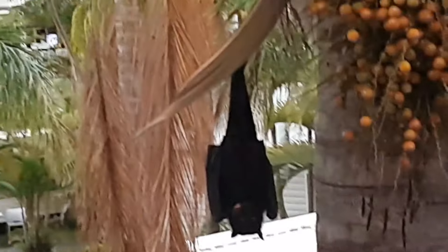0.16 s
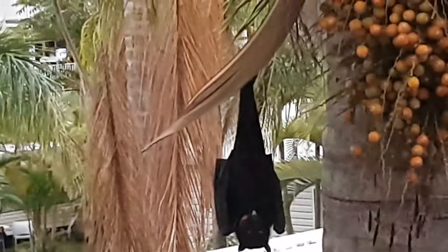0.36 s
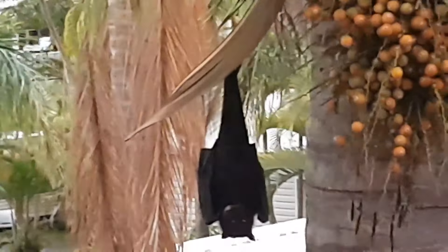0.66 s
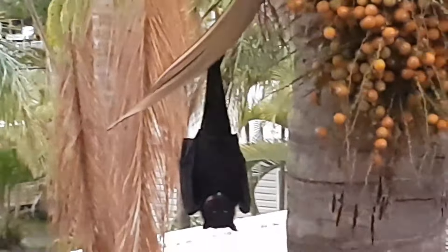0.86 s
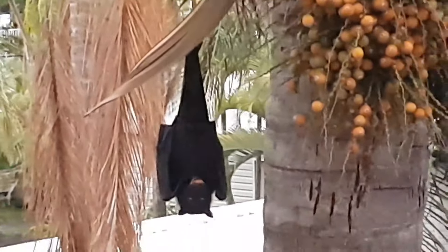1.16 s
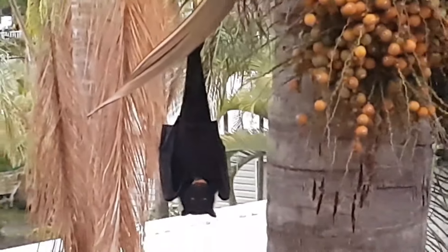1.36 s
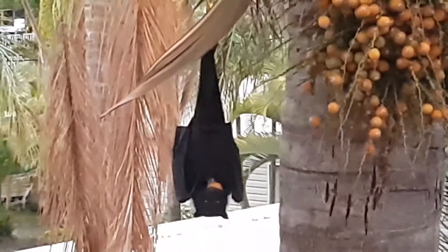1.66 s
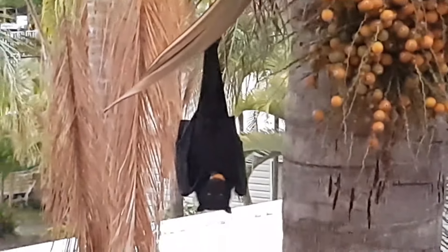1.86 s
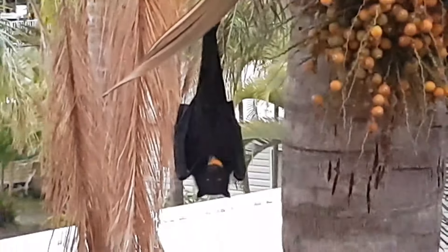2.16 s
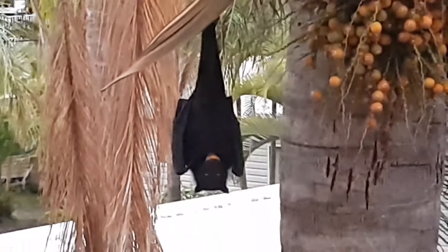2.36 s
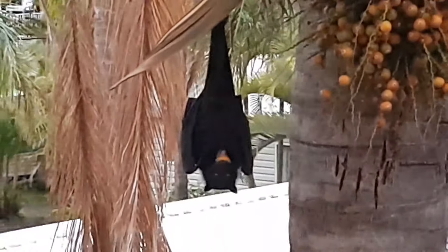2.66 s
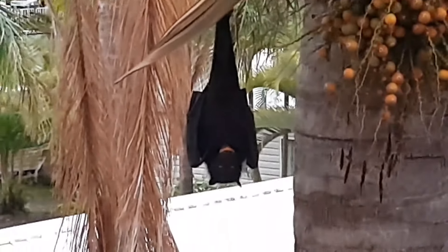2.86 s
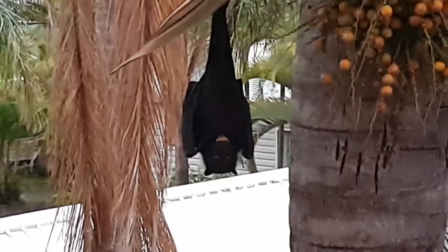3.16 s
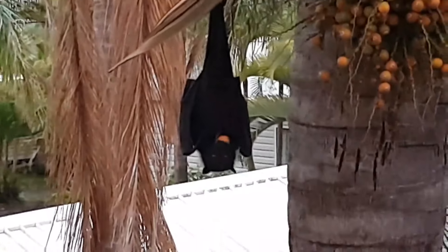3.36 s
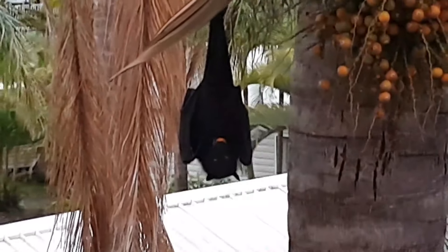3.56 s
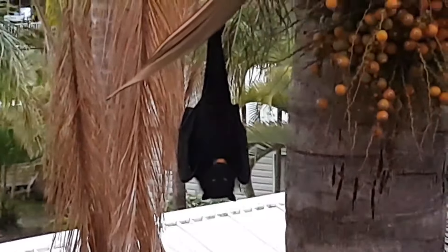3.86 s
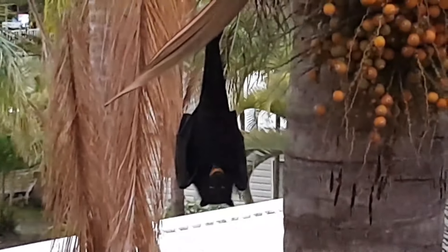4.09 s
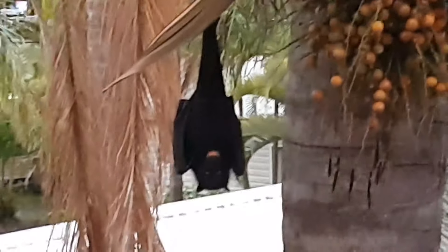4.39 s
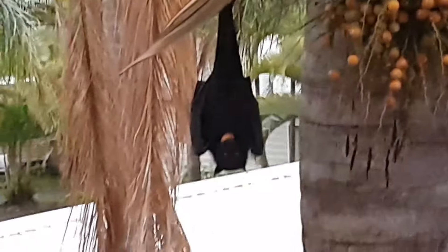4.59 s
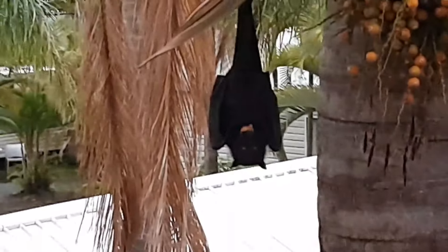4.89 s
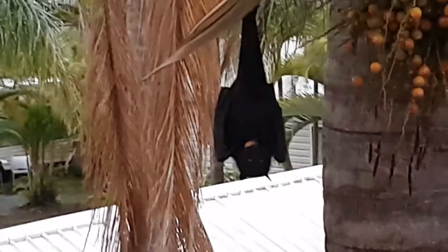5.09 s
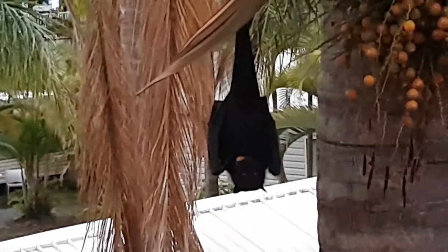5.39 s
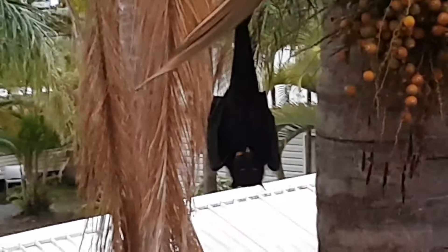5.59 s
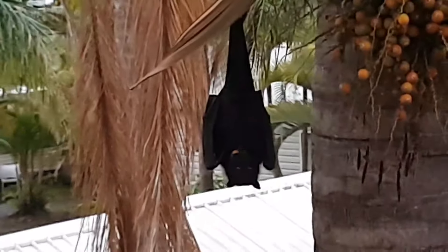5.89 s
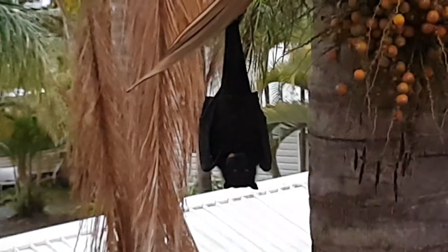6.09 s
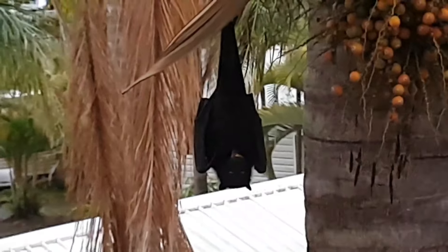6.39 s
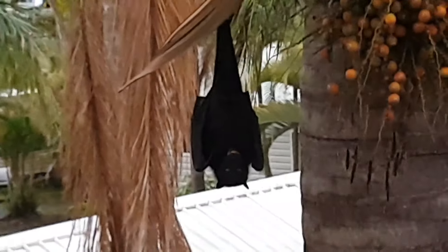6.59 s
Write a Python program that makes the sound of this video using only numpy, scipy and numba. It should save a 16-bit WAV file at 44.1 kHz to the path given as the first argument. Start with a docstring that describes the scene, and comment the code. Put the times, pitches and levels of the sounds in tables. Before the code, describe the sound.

Hoarse, hissing fruit bat rasps and a few throaty yelps burst out over paired cricket chirps, thin cicada buzz and soft suburban rumble.

```python
"""Suburban rumble, leaf hiss, a far propeller, a thin cicada and crickets chirping in pairs sound throughout.
A fruit bat colony in the garden palms joins in, heard on a mono phone: a few voiced yelps, many hoarse rasps.
Rasps are bursting noise through throat and mouth resonances; yelps are throbbing harmonics with breath.
Thin far coos and a whistle are wavering tones; cricket strokes are short falling tones, the cicada a noise band.
The propeller is a tone with its octave beside a blurred drone; rumble and hiss are flickering bands of noise."""
import sys
import numpy as np
from scipy import signal
from scipy.io import wavfile
from scipy.ndimage import uniform_filter1d
from numba import njit

SR = 44100
rng = np.random.default_rng(int(sys.argv[2]) if len(sys.argv) > 2 else 0)


def dump_mix(stems):
    """Bounce the given channels to the path in sys.argv[1] as a 16-bit WAV at rate SR."""
    frames = np.atleast_2d(stems).T  # one column per channel
    limited = np.clip(frames, -1, 1)  # hard clip at full scale
    pcm = np.round(limited * 32767).astype(np.int16)
    wavfile.write(sys.argv[1], SR, pcm)


N = 297234  # samples

# Relative noise spectra of the suburb and the leaves. Each row: frequency in Hz, density in dB per Hz.
RUMBLE_SPECTRUM = [(13, -35), (22, -6), (239, 1), (384, -1.5), (421, -9.5), (490, -7.5), (850, -15),
                   (1100, -44), (1870, -120)]
LEAF_SPECTRUM = [(900, 6.5), (1300, 4), (2000, -0.5), (3000, -3), (4200, -2), (5200, 3.5), (6500, -4),
                 (7500, -14.5), (8500, -11)]
# How the background swells. Each row: time in seconds, rumble level in dB, leaf hiss level in dB.
BACKGROUND_SWELL = [(0, -47, -50), (1.1, -46.5, -47.5), (1.8, -44, -49), (4.2, -43.5, -45.5),
                    (5.6, -41.5, -46), (6.74, -42.5, -45)]
# Far propeller. Each row: time in seconds, blade rate in Hz, fundamental in dB, second harmonic in dB.
PROPELLER_TRACK = [(0, 93, -59.5, -56), (1.3, 94.4, -57, -65), (1.55, 94.64, -54.5, -49.5),
                   (2.3, 97.8, -55.5, -48), (3, 97.86, -55.5, -44.5), (3.7, 98.3, -53, -49),
                   (4.6, 99.6, -61, -49), (5.1, 100.5, -47, -49.5), (5.7, 101.1, -48, -57),
                   (6.1, 100.2, -48.5, -64.5), (6.74, 101.4, -41.5, -58)]
# Blurred far motor drone. Each row: time in seconds, level in dB.
DRONE_LEVEL = [(0, -71), (1.6, -63), (2, -55.5), (3.5, -56), (4.3, -49.5), (5.6, -53), (6.1, -53.5),
               (6.74, -45.5)]
# Two crickets, evenly paced between marks. Each row: chirp number, time of its second stroke in seconds.
LOW_CRICKET_PACE = [(0, .102), (3, .71), (5, 1.125), (8, 1.72), (11, 2.329), (22, 4.537), (32, 6.558)]
HIGH_CRICKET_PACE = [(0, .165), (2, .621), (3, .859), (9, 2.211), (19, 4.479), (22, 5.17), (24, 5.613),
                     (28, 6.516)]
# Voiced bat yelps, one list a call. Each row: time in seconds, pitch in Hz, level in dB,
# throat resonance in Hz, its reach in Hz.
YELP_CALLS = [
    [(.535, 533, -53, 1490, 1100), (.56, 535, -43.5, 1580, 1200), (.59, 493, -49, 1450, 800),
     (.625, 496, -44.5, 1470, 600), (.66, 521.6, -47, 1400, 900)],
    [(.67, 546, -44, 1600, 796), (.705, 554.3, -37, 1620, 450), (.75, 562, -42.5, 1690, 450),
     (.79, 569, -53, 1700, 600)],
    [(.8, 553, -52, 1700, 500), (.85, 578, -47, 1730, 450), (.88, 570, -55, 1720, 450)],
    [(1.62, 643, -54, 1900, 500), (1.65, 618, -38, 1600, 890), (1.7, 589, -44, 1900, 1190)],
    [(2.51, 617, -60, 1760, 500), (2.56, 650, -45, 1930, 500), (2.61, 650, -53, 2120, 698)],
    [(4.71, 600, -35, 2400, 400), (4.74, 601, -41, 2480, 445), (4.78, 589, -36, 2350, 602.6)],
    [(6.22, 938, -53, 2300, 1000), (6.27, 944, -36.5, 2800, 900), (6.305, 962, -33.5, 3100, 1200)],
    [(6.31, 509.5, -33, 2860, 810), (6.35, 529, -30.5, 2920, 1200), (6.41, 530, -30.5, 3130, 1400),
     (6.46, 528, -29, 2690, 1000), (6.5, 522, -47, 2500, 900)],
]
# Hoarse bat rasps. Each row: start in seconds, attack in seconds, hold in seconds, throat level in dB,
# its change over the hold in dB, upper throat minus throat in dB, palate minus throat in dB, mouth level in dB,
# its change over the hold in dB, throat resonance at start in Hz, at end in Hz, upper throat resonance in Hz.
RASP_CALLS = [(.56, 0.022, 0.16, -57, -2, 3, -6, -44.5, -7.5, 2120, 2280, 3950),
              (0.934, 0.027, 0.31, -36.5, 0, -1, -5, -26.5, -3.5, 2560, 2980, 4200),
              (1.692, 0.046, .025, -30.5, -2, -6, -6.5, -23.5, -1, 2580, 2530, 4120),
              (1.938, .045, 0.039, -38.5, 1, -14, -8, -35, -1.5, 2520, 2680, 3410),
              (2.597, 0.03, 0.33, -33.5, -0.5, -4, -6.5, -29, -4, 2510, 2700, 4040),
              (3.216, 0.032, 0.22, -36, 0, -3, -5, -30, -2, 2710, 2710, 3840),
              (3.599, 0.022, 0.024, -32.5, 1.5, -6.5, -8.5, -24, -1, 2800, 2670, 4040),
              (4.072, 0.025, 0.34, -32.5, -2.5, -0.5, -4.5, -26.5, -4, 2740, 2580, 4110),
              (4.696, 0.022, 0.038, -41.5, 0.5, -5, -7, -40.5, 0, 2450, 2440, 4050),
              (4.739, 0.057, 0.15, -36, 1.5, -4, -7, -35, -1.5, 2790, 2800, 3880),
              (5.175, 0.027, 0.19, -34, -7, 0, -1.5, -32.5, -7.5, 2820, 2850, 4050),
              (5.495, 0.044, 0.016, -33, -3, -3, -9, -30.5, -3.5, 2890, 2830, 4070),
              (5.926, .022, 0.02, -45, -0.5, -17, -5, -39.5, -7.5, 2480, 2360, 3840),
              (6.024, 0.024, 0.012, -35, 6.5, -6, -4.5, -21.5, -1.5, 2550, 2815, 3980),
              (6.43, 0.047, 0.088, -30.5, -0.5, -1.5, -5.5, -35, 1.5, 2800, 2730, 4320),
              (6.71, 0.032, 0.035, -34, 0, 1, -8, -23.5, 0, 2820, 2950, 4100)]
# Far thin calls. Each row: start in seconds, length in seconds, pitch at start in Hz, pitch at end in Hz,
# level in dB, pitch waver as a share.
FAR_CALLS = [(1.702, 0.32, 1200, 1113, -52, .045), (1.945, 0.21, 1250, 1335, -52.5, .045),
             (2.744, 0.32, 1357, 1314, -51, .08), (5.222, 0.49, 1147, 1200, -49.5, .09),
             (6.082, 0.2, 1131, 1030, -50, .045), (0.653, 0.12, 6100, 6300, -47.5, .03)]
# Narrow dips through everything heard. Each row: time in seconds, lower dip in Hz, upper dip in Hz.
DIP_TRACK = [(0, 2400, 4400), (1.0, 2350, 4450), (1.17, 2350, 4750), (1.4, 2450, 4420), (1.6, 2600, 4300),
             (1.8, 2020, 4700), (2.15, 2120, 4000), (2.5, 2600, 4350), (2.8, 2230, 4680), (3.1, 2200, 4150),
             (3.5, 2300, 4350), (3.8, 2200, 3900), (4.2, 2430, 4800), (5.0, 2050, 4300), (5.5, 2200, 3900),
             (6.0, 2100, 4350), (6.27, 2240, 4200), (6.45, 1800, 4400), (6.74, 1800, 4350)]

FAR_STROKES = 16  # strokes of a fainter, higher cricket, at chance moments
RISE_DB = 25  # climbed during a rasp's attack
THROAT_FADE_DB_S, UPPER_FADE_DB_S, PALATE_FADE_DB_S, MOUTH_FADE_DB_S = 110.5, 148.5, 131.5, 159  # after the hold
KNEE_S = .019  # the hold rounds off into the fade
TAIL_DB, TAIL_FADE_DB_S = -26.5, 46  # a faint, slower tail lingers
ONSET_DB, ONSET_S = 4, .05  # the palate is brighter as the mouth snaps open
WAVER_DB = .9  # scales each resonance's own level walk
SCATTER, SCATTER_HZ, SCATTER_S = .65, 100, .12  # frond patches: depth, nominal smoothing in Hz and in seconds
GARDEN_T60_S, GARDEN_DB = .25, -10  # echo decay time and level
TOP_HZ = 8880  # edge of the steep top cut


def undb(db):
    """Turn decibels into an amplitude ratio."""
    return 10 ** (np.asarray(db) / 20)


def unit(x):
    """Scale to an RMS level of 1."""
    return x / np.sqrt(np.mean(x ** 2))


def noise():
    """White noise as long as the scene."""
    return rng.standard_normal(N)


def track(tables):
    """Columns of a list of calls, sample by sample, after a gate that opens only inside the calls."""
    t, gate = np.arange(N) / SR, np.zeros(N)
    for call in tables:
        gate[int(call[0][0] * SR):int(call[-1][0] * SR)] = 1
    times, *columns = np.transpose(np.vstack(tables))
    return [uniform_filter1d(gate, size=150)] + [np.interp(t, times, column) for column in columns]


@njit
def svf(x, hz, width):
    """State-variable band-pass whose centre may move; gain 1 at the centre."""
    y, band_state, low_state = np.empty(len(x)), 0., 0.
    for i in range(len(x)):
        g, k = np.tan(np.pi * hz[i] / SR), width / hz[i]
        v = (band_state + g * (x[i] - low_state)) / (1 + g * (g + k))
        band_state, low_state, y[i] = 2 * v - band_state, low_state + 2 * g * v, k * v
    return y


def band(x, hz, width_hz):
    """One resonance at a fixed or moving centre."""
    return svf(x, np.clip(hz * np.ones(N), 20, .45 * SR), float(width_hz))


def walk(rate):
    """Random levels held 1 / rate s and slewed twice; the spread is about 0.74."""
    k = int(SR / rate)
    held = np.repeat(rng.standard_normal(N // k + 1), k)
    return 1.0 * uniform_filter1d(uniform_filter1d(held, k), k)[:N]


def hush(points, centres_hz):
    """Third-octave bands of noise that flicker alone, together at RMS 1."""
    hz_points, db_points = np.transpose(points)
    densities_db = np.interp(np.log(centres_hz), np.log(hz_points), db_points)
    total = 0
    for hz, density_db in zip(centres_hz, densities_db):
        flicker = undb(density_db + 1.44 * walk(6.6))
        total = total + flicker * band(band(noise(), hz, hz / 3), hz, hz / 2)
    return unit(total)


def suburb():
    """Traffic rumble below, leaf hiss above."""
    _, rumble_db, hiss_db = track([BACKGROUND_SWELL])
    centres_hz = 25 * 2 ** (np.arange(26) / 3)
    rumble = undb(rumble_db) * hush(RUMBLE_SPECTRUM, centres_hz[:16])
    return rumble + undb(hiss_db) * hush(LEAF_SPECTRUM, centres_hz[16:])


def propeller():
    """Far blade tone and its octave, slowly rising, beside a blurred drone of narrow-band noise."""
    _, hz, first_db, second_db = track([PROPELLER_TRACK])
    phase = 2 * np.pi * np.cumsum(hz * (1 + .0088 * walk(5))) / SR
    fundamental = undb(first_db + .8 * walk(2.0)) * np.sin(phase)
    octave = undb(second_db + 1.5 * walk(15)) * np.sin(2 * phase)
    drone = band(band(noise(), 360 * (1 + .017 * walk(2)), 27), 351, 55)
    return np.sqrt(2) * (fundamental + octave) + undb(track([DRONE_LEVEL])[1]) * unit(drone)


def cicada():
    """A thin, narrow buzzing band of noise that throbs a little."""
    buzz = band(band(noise(), 7870, 140), 7870, 240)
    return undb(-57.5 + 1.3 * walk(8.2)) * unit(buzz)


def paced(marks):
    """Times of all chirps, evenly spaced between the marks."""
    number, s = np.transpose(marks)
    return np.interp(np.arange(number[-1] + 1), number, s)


def cricket(times, top_hz, end_hz, length, gap, db, first_db):
    """Each wing stroke is a short falling tone that the ground repeats; the first of a pair is weaker."""
    t = np.arange(int(length * SR)) / SR
    cycles = top_hz * t + (end_hz - top_hz) * t ** 2 / length / 2
    stroke = np.sin(np.pi * t / length) * np.sin(2 * np.pi * cycles)
    strokes, chance = np.zeros(N), rng.standard_normal((len(times), 2))
    for s, (second_chance, first_chance) in zip(times, chance):
        strokes[int((s - length / 2) * SR)] = undb(db + 1.3 * second_chance)
        # with no gap the two add up to a single stroke
        strokes[int((s - gap - length / 2) * SR)] += undb(db + first_db + 1.2 * first_chance)
    direct = signal.fftconvolve(strokes, stroke)[:N]
    return direct + undb(-8.0) * np.roll(direct, int(.0078 * SR)) + undb(-12.0) * np.roll(direct, int(.02 * SR))


def yelps():
    """Hoarse, throbbing harmonics, loudest near the throat resonance, with a bright breath."""
    gate, hz, db, throat_hz, reach_hz = track(YELP_CALLS)
    phase = 2 * np.pi * np.cumsum(hz * (1 + .016 * walk(140))) / SR
    throb = 2 * np.pi * np.cumsum(56 * (1 + .17 * walk(30))) / SR  # a slow second vibration of the folds
    voice, power = 0, 0
    for k in range(2, 9):
        off = (k * hz - throat_hz) / reach_hz
        gain = undb(-6. * off ** 2 * np.where(off < 0, 1.5, 1.3))
        hoarseness = undb(3 * walk(60) + 4 * np.sin(throb + 2.2 * k))
        voice = voice + gain * hoarseness * np.sin(k * phase)
        power = power + gain ** 2
    breath = undb(-8.) * unit(band(noise(), throat_hz, 1400))
    breath = breath + undb(-17.) * unit(band(noise(), 6500, 4000))
    return gate * undb(db) * (voice / np.sqrt(power) + breath)


def effort(db, change_db, fade_db_s, onset_db=0.):
    """Gain of one resonance over all rasps: quick rise, a hold that drifts, a fade with a faint tail."""
    t, gain = np.arange(N) / SR, 0
    for (start, attack, hold), peak, change in zip(np.array(RASP_CALLS)[:, :3], db, change_db):
        u = t - start - attack  # seconds since the end of the attack
        after = KNEE_S * np.logaddexp(0, (u - hold) / KNEE_S)
        fade = undb(-fade_db_s * after) + undb(TAIL_DB - TAIL_FADE_DB_S * after)
        rise = -RISE_DB * np.maximum(-u / attack, 0) ** 1.53
        drift = change * np.clip(u / hold, 0, 1)
        onset = onset_db * np.exp(-np.maximum(u, 0) / ONSET_S)
        gain = gain + (u > -1.3 * attack) * fade * undb(peak + rise + drift + onset)
    return gain * undb(WAVER_DB * walk(14))


def rasps():
    """Chaotic vocal folds: noise in uneven bursts through moving throat and mouth resonances."""
    (start, attack, hold, db, change_db, upper_db, palate_db,
     mouth_db, mouth_change_db, from_hz, to_hz, high_hz) = np.transpose(RASP_CALLS)
    t, marks = np.arange(N) / SR, np.ravel([start, start + attack + hold], "F")

    def glide(a, b):
        """Resonance moving from a to b in each rasp, with a random wander."""
        return np.interp(t, marks, np.ravel([a, b], "F")) * (1 + .039 * walk(15))

    low_hz, upper_hz = glide(from_hz, to_hz), glide(high_hz, high_hz)
    folds = noise() * undb(2.3 * walk(500) + 1.1 * walk(45))
    throat = band(band(folds, low_hz, 800), low_hz, 1300)
    throat = throat + undb(-14.0) * band(folds, 2170, 1400)
    upper = band(band(folds, upper_hz, 700), upper_hz, 1000)
    palate = band(band(folds, 4530, 1300), 4540, 1600)
    mouth_hz = 6200 * (1 + .03 * walk(8))
    mouth = band(band(folds, mouth_hz, 1800), mouth_hz, 3600)
    mouth = mouth - undb(1.5) * band(band(folds, 7820, 1400), 8080, 2300)
    # neighbouring resonances join with alternating sign
    return (effort(db, change_db, THROAT_FADE_DB_S) * unit(throat)
            - effort(db + upper_db, change_db, UPPER_FADE_DB_S) * unit(upper)
            + effort(db + palate_db, change_db, PALATE_FADE_DB_S, ONSET_DB) * unit(palate)
            - effort(mouth_db, mouth_change_db, MOUTH_FADE_DB_S) * unit(mouth))


def tone(hz, waver, flutter_db):
    """A breathy tone: a sine whose pitch and level wander quickly."""
    level = np.sqrt(2) * undb(flutter_db * walk(90))
    return level * np.sin(2 * np.pi * np.cumsum(hz * (1 + waver * walk(150))) / SR)


def thin_calls():
    """Far coos and one high whistle, each a wavering tone swelling and fading once."""
    t, out = np.arange(N) / SR, 0
    for start, length, from_hz, to_hz, db, waver in FAR_CALLS:
        u = np.clip((t - start) / length, 0, 1)
        swell = np.sqrt(np.abs(np.sin(np.pi * u)))
        out = out + undb(db) * swell * tone(from_hz + (to_hz - from_hz) * u, waver, 3.3)
    return out


def garden(x):
    """Walls, roof and trunks send back a short scatter of echoes."""
    t = np.arange(int(.5 * SR)) / SR
    sparse = rng.standard_normal(len(t)) * (rng.random(len(t)) < .3)
    echoes = sparse * undb(-60 * t / GARDEN_T60_S) * (t > .004)
    return x + undb(GARDEN_DB) * signal.fftconvolve(x, echoes / np.sqrt(np.sum(echoes ** 2)))[:N]


def fronds(x):
    """Paths through stirring fronds interfere: narrow patches of the treble swell and cancel."""
    hz, _, z = signal.stft(x, SR, nperseg=1024, noverlap=768)
    field = rng.standard_normal(z.shape) + 1j * rng.standard_normal(z.shape)
    for _ in range(2):
        field = uniform_filter1d(field, int(SCATTER_HZ * 1024 / SR), axis=0)
        field = uniform_filter1d(field, int(SCATTER_S * SR / 256), axis=1)
    depth = SCATTER * np.clip(hz / 1500, 0, 1)[:, None]  # full above 1500 Hz
    gain = np.abs(1 + depth * field / np.std(field)) / np.sqrt(1 + depth ** 2)
    return signal.istft(z * gain, SR, nperseg=1024, noverlap=768)[1][:N]


def scene():
    """Rasps and suburb pass the fronds; calls and crickets echo in the garden; cicada and propeller come direct."""
    low = cricket(paced(LOW_CRICKET_PACE), 5400, 4700, .021, .033, db=-39, first_db=-3.0)
    high = cricket(paced(HIGH_CRICKET_PACE), 5950, 5200, .012, .038, db=-37.0, first_db=-3.5)
    far_times = rng.uniform(.1, N / SR - .1, FAR_STROKES)
    far = cricket(far_times, 6450, 5300, .012, 0, db=-55, first_db=-3.5)
    scattered = fronds(garden(rasps()) + suburb())
    echoing = garden(yelps() + thin_calls() + low + high + far)
    mono = scattered + echoing + cicada() + propeller()
    return np.array([mono, mono])


def record(dry):
    """The mono phone: two narrow dips wander in pitch and depth; the top is cut steeply."""
    _, lower_hz, upper_hz = track([DIP_TRACK])
    lower_depth, upper_depth = (np.clip(.95 + .25 * walk(5), 0, 1) for _ in range(2))
    mono = dry[0] - lower_depth * band(dry[0], lower_hz, 150)
    mono = mono - upper_depth * band(mono, upper_hz, 260)
    mono = np.tanh(3 * mono) / 3  # the loudest peaks are rounded
    top_cut = signal.ellip(12, .2, 85, TOP_HZ, fs=SR, output="sos")
    return signal.sosfilt(top_cut, [mono, mono])


dry = scene()
out = record(dry)
dump_mix(out)
```